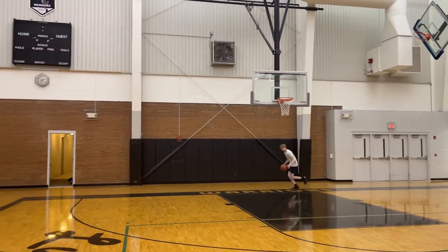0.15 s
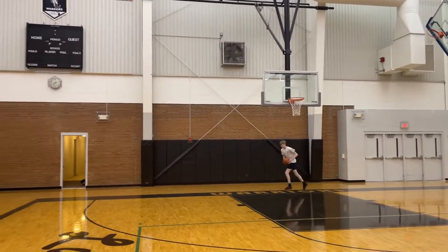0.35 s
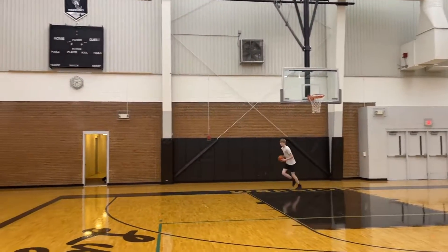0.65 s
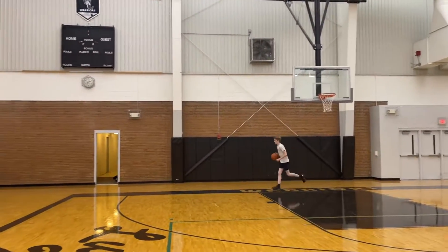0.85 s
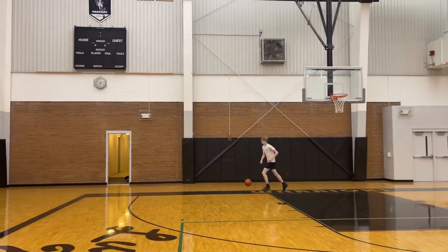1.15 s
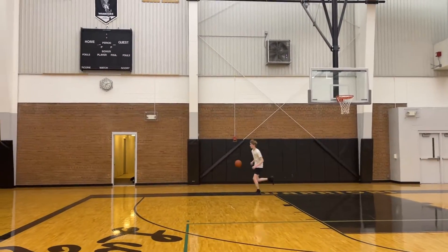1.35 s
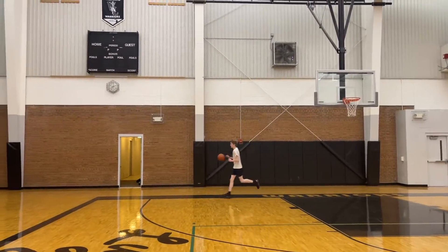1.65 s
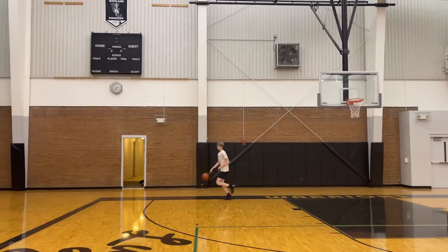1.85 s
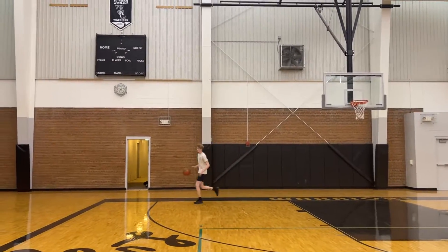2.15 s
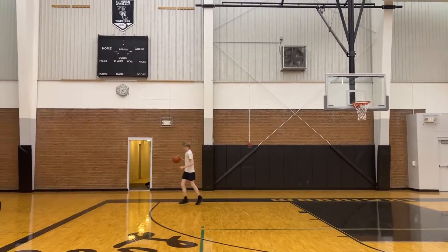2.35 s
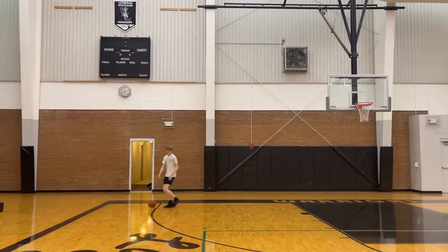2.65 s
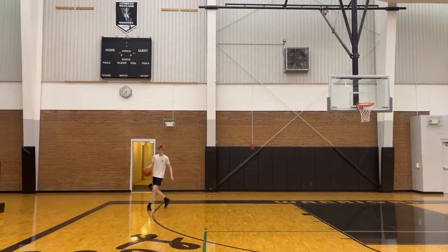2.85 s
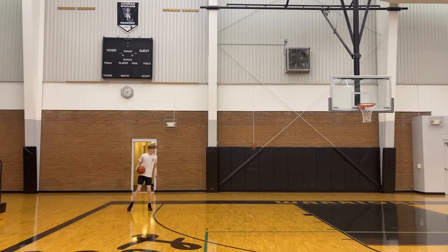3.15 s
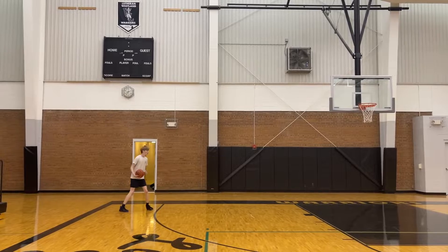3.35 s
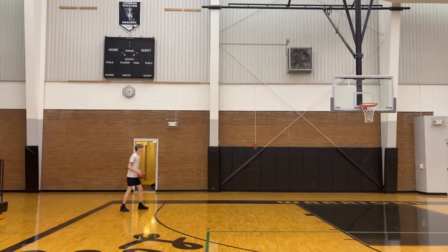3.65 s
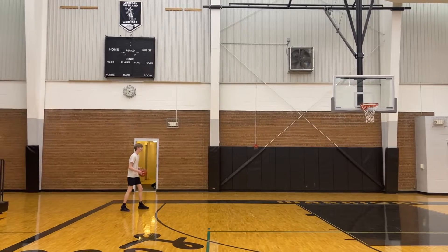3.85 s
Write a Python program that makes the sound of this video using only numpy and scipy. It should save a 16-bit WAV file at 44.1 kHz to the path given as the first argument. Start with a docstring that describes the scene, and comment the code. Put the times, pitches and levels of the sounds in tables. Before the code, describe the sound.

Spaced basketball dribbles crack and boom on sprung boards, echoing off gym walls, with soft hand pats between and deep ventilation rumble beneath.

```python
"""Basketball in an empty gym

A player dribbles a ball across the sprung wooden floor of a large gym, some way from two microphone ports.
Each bounce adds a slap, a short ring, a plank knock and a falling thump, all set by how hard the ball lands.
The walls return it as echoes whose delays follow the player's place, and filtered noise dies away as the hall.
Between bounces the hand pats the ball with short smeared clicks; steady shaped noise is the ventilation."""
import sys
import numpy as np
from scipy import signal
from scipy.fft import rfft, irfft
from scipy.io import wavfile

SR = 44100
rng = np.random.default_rng(int(sys.argv[2]) if len(sys.argv) > 2 else 0)


def master(y):
    """Save y as 16-bit WAV."""
    cut = np.clip(np.atleast_2d(y).T, -1, 1)
    pcm = np.round(cut * 32767)  # scale
    wavfile.write(sys.argv[1], SR, pcm.astype(np.int16))


N = 176832  # length in samples

# In every table, level_db is relative: the functions that play it add their own gain.

# One row a bounce; the first lands before the start and is already dying away.
# The end wall is padded in places and bare in others, so its echo varies.
# Columns: start_s, across_court_m, from_end_wall_m, force_db, wall_echo_body_db, wall_echo_treble_db
BOUNCES_OF_BALL = [(-.85, -2.5, 3.3, -3, -6, -6), (.0344, 0, 3.3, -6, -3.5, -6.5),
                   (1.1763, 3.3, 3.4, -4.5, -9, -11), (2.0268, 5.8, 3.9, -1, -13, -2),
                   (2.7130, 7.4, 5.1, -.5, -1.5, -10)]
# Tone of the ball slapping flat: pitch_hz, level_db
SLAP_TONE = [(60, -5), (300, 9), (480, 8), (900, 5), (1250, 15), (2000, 8.5), (3000, 7), (5000, 3.5),
             (7000, -4), (12000, -18)]
# Tone of the pebbled skin touching the floor: pitch_hz, level_db
SKIN_TONE = [(2000, -28), (3500, -10), (5000, -6), (7000, -2), (8600, 3.5), (11000, 8), (12200, 0),
             (13500, -26), (16000, -30)]
# Tone of the hall's long answer: pitch_hz, level_db
HALL_TONE = [(25, -24), (45, -13), (62, 2.5), (92, 8.7), (135, 2), (210, -11.5), (400, -17.5), (590, -24.5),
             (900, -24), (1300, -18.1), (1900, -20.6), (2700, -28), (4800, -34.3), (7500, -35.2),
             (11300, -38.5)]
# How each part of a bounce grows with force (dB per dB): hard ones are brighter, knock more, boom more
SKIN_GROWTH, KNOCK_GROWTH, THUMP_GROWTH, HALL_GROWTH, BOOM_GROWTH = 1.9, 2.2, .85, .6, .3
# Gains of the parts at a force of 0 dB (dB)
SKIN_DB, KNOCK_DB, THUMP_DB, HALL_DB, BOOM_DB = 1.8, 3.5, 1, .1, 1.2
# The player passes the microphone's axis from right to left
AXIS_M, LEAD_MS_PER_M = 4.3, .026


def dribble(touch_s=.0006, skin_spread_s=.0004, buzz_db=-16, buzz_s=.004):
    """The pebbled skin touches first, then the ball slaps flat, buzzes briefly and drives the boards."""
    out = np.zeros((2, N))
    slap = click(SLAP_TONE, top_hz=13000)
    skin = click(SKIN_TONE, top_hz=13500)
    reflected = click(SKIN_TONE, top_hz=11900) + click(THROWN_BACK_TONE, top_hz=11900)
    for s, across_m, _, force_db, _, _ in BOUNCES_OF_BALL:
        lead_ms = LEAD_MS_PER_M * (across_m - AXIS_M)
        force = from_db(force_db)
        skin_gain = from_db(SKIN_DB + SKIN_GROWTH * force_db)
        knock_db = KNOCK_DB + KNOCK_GROWTH * force_db
        thump_gain = from_db(THUMP_DB + THUMP_GROWTH * force_db)
        hall_gain = from_db(HALL_DB + HALL_GROWTH * force_db)
        boom_db = BOOM_DB + BOOM_GROWTH * force_db

        add(out, s - touch_s, skin_gain * aim(scatter(skin, skin_spread_s), 0))
        add(out, s, force * aim(-slap, lead_ms))  # the dented floor first pulls the air down
        add(out, s, force * aim(ball_ring(), lead_ms))
        add(out, s, from_db(force_db + buzz_db) * scatter(slap + skin, buzz_s))
        add(out, s, from_db(knock_db) * aim(plank(), lead_ms))
        add(out, s, thump_gain * aim(boards(), lead_ms))
        add(out, s, hall_gain * early(reflected))
        add(out, s, hall_gain * hall(HALL_TONE, boom_db, knock_db, gap_s=.006, build_s=.02))
    return out


# What the ball rings with: pitch_hz, level_db, fade_s (time to fall by 60 dB)
BALL_TONES = [(390, -26.5, .065), (947, -43, .3), (1200, -18, .026), (1530, -45, .15), (1785, -39, .1),
              (2300, -52, .2), (2584, -55, .25), (2810, -44, .15)]


def ball_ring():
    """The ball's skin and the air inside ring briefly after the blow, as a sum of fading tones."""
    t = np.arange(SR // 2) / SR
    ring = np.zeros(len(t))
    for hz, db, fade_s in BALL_TONES:
        fade = np.exp(-np.log(1000) * t / fade_s)
        ring -= from_db(db) * fade * np.cos(2 * np.pi * hz * t)
    return ring


def plank(hz=745, fade_s=.045, db=-24.5):
    """The struck plank knocks: one tone that falls by 60 dB in fade_s."""
    t = np.arange(SR // 4) / SR
    fade = np.exp(-np.log(1000) * t / fade_s)
    return -from_db(db) * fade * np.cos(2 * np.pi * hz * t)


def boards(low_hz=86, sweep_hz=252, sweep_s=.006, peak_s=.0115, shape=1.9, db=-10.5):
    """Bending waves in the sprung floor: the high ones arrive first, so the thump falls in pitch."""
    t = np.arange(SR // 4) / SR
    turns = low_hz * t + sweep_hz * sweep_s * (1 - np.exp(-t / sweep_s))
    swell = (t / peak_s * np.exp(1 - t / peak_s)) ** shape
    return -from_db(db) * swell * np.sin(2 * np.pi * turns)


# Tone of the slap as the walls throw it back: pitch_hz, level_db
THROWN_BACK_TONE = [(60, -5), (400, 12), (900, 11), (1300, 16.5), (1900, 14.5), (2900, 4.5), (5000, 2.5),
                    (7000, -2), (12000, -18)]
# Tone of the sharp tick in an echo, before the air dulls it: pitch_hz, level_db
ECHO_TICK_TONE = [(2000, -22), (3500, -3), (5000, -1.5), (6800, 2.5), (8600, 5.5), (11000, 11), (12200, 5),
                  (13500, -20), (16000, -30)]


def walls(body_spread_s=.0016, treble_spread_s=.0006, body_db=-1, treble_db=-1,
          ring_db=-6, ring_top_hz=3000, thump_db=-3):
    """Strong single echoes carry a smeared slap and tick, the ball's ring and the thump."""
    out = np.zeros((2, N))
    body = click(THROWN_BACK_TONE, top_hz=12400)
    thump = boards()
    low_pass = signal.butter(2, ring_top_hz, fs=SR, output="sos")
    ring = signal.sosfilt(low_pass, ball_ring())
    for s, across_m, wall_m, force_db, wall_body_db, wall_treble_db in BOUNCES_OF_BALL:
        strength = from_db(HALL_GROWTH * force_db)
        for delay_s, low_db, high_db in echo_paths(across_m, wall_m, wall_body_db, wall_treble_db):
            at = s + delay_s
            low = strength * from_db(low_db)
            high = strength * from_db(high_db)
            tick = click(through_air(ECHO_TICK_TONE, delay_s), top_hz=12800)
            lead_ms = rng.uniform(-.1, .1)  # each echo's slap has its own direction
            add(out, at, low * from_db(body_db) * aim(scatter(body, body_spread_s), lead_ms))
            add(out, at, high * from_db(treble_db) * scatter(tick, treble_spread_s))
            add(out, at, low * from_db(ring_db) * ring)
            add(out, at, low * from_db(thump_db) * thump)
    return out


# Other echoing surfaces, in order: right wall (left behind), left wall (coming nearer),
# basket frame, a surface near the microphone. Delay and level change as the player crosses the court.
# Columns: delay_at_0_m_ms, delay_ms_per_m, body_at_0_m_db, treble_at_0_m_db, level_db_per_m
ECHO_SURFACES = [(36.9, 3.33, -6.5, .3, -1.6), (126.4, -6.87, -30, -27, 2.9), (19.2, -1.52, -25, -21, 2.15),
                 (12.4, 0, -13.5, -23, 1.25)]
SOUND_M_PER_S = 343
# The upper end wall answers a little after its foot, and duller
UPPER_LAG_S, UPPER_BODY_DB, UPPER_TREBLE_DB = .0098, -11, -19


def echo_paths(across_m, wall_m, body_db, treble_db):
    """The echoes of a bounce at this place on the court, as (delay s, body dB, treble dB)."""
    round_trip_s = 2 * wall_m / SOUND_M_PER_S
    foot = (round_trip_s, body_db, treble_db)
    upper = (round_trip_s + UPPER_LAG_S, UPPER_BODY_DB, UPPER_TREBLE_DB)
    paths = [foot, upper]
    for ms, ms_per_m, low_db, high_db, db_per_m in ECHO_SURFACES:
        delay_s = (ms + ms_per_m * across_m) / 1000
        change_db = db_per_m * across_m
        paths.append((delay_s, low_db + change_db, high_db + change_db))
    return paths


AIR_DB_PER_S, AIR_AT_HZ = 85, 10000  # loss on the way, at this pitch


def through_air(spectrum, s):
    """Air takes treble over s seconds of travel; the loss grows with the square of frequency."""
    return [(hz, db - AIR_DB_PER_S * s * (hz / AIR_AT_HZ) ** 2) for hz, db in spectrum]


def early(pulse, db=-8, first_s=.011, fade_s=.07, count=150):
    """Many weak reflections from floor, walls and roof beams."""
    delay = rng.exponential(fade_s, count)
    size = rng.standard_normal(count) * np.exp(-delay / fade_s / 2)
    taps = np.zeros(SR)
    taps[np.minimum((first_s + delay) * SR, SR - 1).astype(int)] = size
    return from_db(db) * signal.fftconvolve(taps / np.linalg.norm(taps), pulse)


# How long the hall rings: pitch_hz, fade_s (time to fall by 60 dB)
HALL_FADES = [(60, 1.3), (120, 1.2), (250, 1.4), (500, 1.8), (1200, 2.3), (2500, 2.1), (4000, 1.55),
              (7000, 1.0), (11000, .68)]
# Resonances that linger in the hall: pitch_hz, width_hz, boost_db (scaled by ring_db below)
LINGERING_TONES = [(296, 25, 3), (738, 48, 8.5), (1192, 60, 2.8), (1335, 45, 2.8), (1775, 40, 3.5),
                   (2830, 100, 1.5)]


def hall(spectrum, bass_db, ring_db, gap_s, build_s, bass_hz=220, size=512):
    """The hall's answer to one blow: it builds up, then every band dies at its own speed."""
    count = 2 * SR
    hz, t, bands = signal.stft(diffuse(spectrum, count), SR, nperseg=size)
    fade_db = -60 * t / read(HALL_FADES, hz)[:, None]
    tail = signal.istft(bands * from_db(fade_db), SR, nperseg=size)[1][:, :count]

    hz = np.fft.rfftfreq(count, 1 / SR)
    t = np.arange(count) / SR
    # a ringing bounce leaves stronger resonances in the air
    peaks = sum(db / (1 + (2 * (hz - f) / width) ** 2) for f, width, db in LINGERING_TONES)
    peaks_db = from_db(ring_db) * peaks
    shelf_db = bass_db / (1 + (hz / bass_hz) ** 4)
    build = 1 - np.exp(-(np.maximum(t - gap_s, 0) / build_s) ** 2)
    return irfft(rfft(tail) * from_db(peaks_db + shelf_db)) * build


# When the hand meets the ball: start_s, level_db
HAND_PATS = [(.9475, -11), (1.7522, 1), (2.4632, -13), (2.5460, 2.5)]
# Tone of a pat: pitch_hz, level_db
PAT_TONE = [(80, -10), (300, 0), (600, 0), (850, -3), (1200, 2), (2200, -12), (4000, -15.5), (7000, -24),
            (11500, -24), (13500, -40)]


def hand(hall_db=-35):
    """The palm pats the ball: a smeared click, its early reflections and a faint answer from the hall."""
    out = np.zeros((2, N))
    pat = click(PAT_TONE, top_hz=12000)
    for s, db in HAND_PATS:
        add(out, s, from_db(db) * scatter(pat, spread_s=.001))
        add(out, s, from_db(db) * early(pat, db=-4, first_s=.01, fade_s=.03))
        answer = hall(PAT_TONE, bass_db=0, ring_db=-20, gap_s=.008, build_s=.01)
        add(out, s, from_db(db + hall_db) * answer)
    return out


# Tone of the ventilation: pitch_hz, level_db
VENT_TONE = [(20, -46), (42, -27), (58, -5.8), (80, -9.8), (120, -20.5), (200, -28.5), (450, -34),
             (900, -39), (1600, -41), (3000, -52), (6000, -62), (11300, -60)]


def ventilation(db=0):
    """A deep, lumpy duct rumble with a faint rush of air, made from shaped noise."""
    return from_db(db) * diffuse(VENT_TONE, N)


# How alike left and right are in diffuse sound: pitch_hz, likeness (1 = the same, 0 = unrelated)
LEFT_RIGHT_LIKENESS = [(60, .995), (150, .96), (300, .85), (600, .58), (1100, .3), (1600, .05), (2400, .5),
                       (3500, .65), (6000, .55), (9000, .85)]


def diffuse(spectrum, count, top_hz=11700):
    """Noise arriving from all sides at both ports; distance has taken its highest treble."""
    hz = np.fft.rfftfreq(count, 1 / SR)
    mid, side = rfft(rng.standard_normal((2, count)))
    same = np.clip(read(LEFT_RIGHT_LIKENESS, hz), -1, 1)
    shared = mid * np.sqrt((1 + same) / 2)
    opposite = np.outer([1, -1], np.sqrt((1 - same) / 2)) * side
    gain = from_db(read(spectrum, hz)) / (1 + (hz / top_hz) ** 44)
    return irfft((shared + opposite) * gain, count)


def click(spectrum, top_hz=15000, size=4096):
    """The most compact causal pulse that has this spectrum, cut steeply above top_hz."""
    hz = abs(np.fft.fftfreq(size, 1 / SR))
    gain = from_db(read(spectrum, hz)) / (1 + (hz / top_hz) ** 44) + 1e-4  # keeps the log finite
    minimum_phase = np.exp(np.conj(signal.hilbert(np.log(gain))))
    return np.fft.ifft(minimum_phase).real


def scatter(pulse, spread_s, size=1024):
    """Smears a pulse over a short time, as a rough surface does."""
    burst = rng.standard_normal(size) * np.exp(-np.arange(size) / SR / spread_s)
    return signal.fftconvolve(pulse, burst / np.linalg.norm(burst))[:len(pulse)]


def aim(sound, lead_ms):
    """Sound from one side reaches the nearer port first; a positive lead favours the left."""
    delay = np.array([[-.5], [.5]]) * lead_ms * SR / 1000  # in samples, left then right
    taps = np.sinc(np.arange(-12, 13) - delay) * signal.windows.hann(25)
    return signal.fftconvolve(sound[None], taps)


def from_db(db):
    """Turns decibels into a plain gain."""
    return 10 ** (np.asarray(db) / 20)


def read(points, hz):
    """Joins points by straight lines on a log-frequency axis."""
    f, value = np.transpose(points)
    return np.interp(np.log(hz + 1), np.log(f), value)


def add(mix, s, sound):
    """Mixes a sound in at time s, dropping what falls outside the mix."""
    at = round(s * SR)
    sound = sound[..., max(-at, 0):]
    part = mix[:, max(at, 0):][:, :sound.shape[-1]]
    part += sound[..., :part.shape[1]]


def scene():
    """The bounces, their wall echoes, the hand and the ventilation together."""
    return dribble() + walls() + hand() + ventilation()


# The two microphone ports: pitch_hz, left_lead_radians, left_over_right_db
MICROPHONE_PORTS = [(60, 0, 1.4), (300, 0, 1.5), (600, 0, 2.6), (1800, 0, 2.5), (3300, .65, 3.3),
                    (7000, .55, 2), (8300, 0, 0), (9200, -1, 0), (10000, -2.7, 0), (11000, -4, 0),
                    (12500, -5.6, 0)]
EDGE_HZ = 15800  # nothing much is heard above this


def record(dry):
    """The two ports differ in phase and level; then the band limit."""
    hz = np.fft.rfftfreq(2 * N, 1 / SR)
    ports = np.array(MICROPHONE_PORTS)
    lead = read(ports[:, :2], hz)
    balance_db = read(ports[:, ::2], hz)
    left = from_db(balance_db / 2)
    right = from_db(-balance_db / 2) * np.exp(-1j * lead)
    heard = irfft(rfft(dry, 2 * N) * np.array([left, right]))[:, :N]
    low_pass = signal.firwin(511, EDGE_HZ, window=("kaiser", 9), fs=SR)
    return signal.oaconvolve(heard, low_pass[None], "same")


dry = scene()
out = record(dry)
master(out)
```